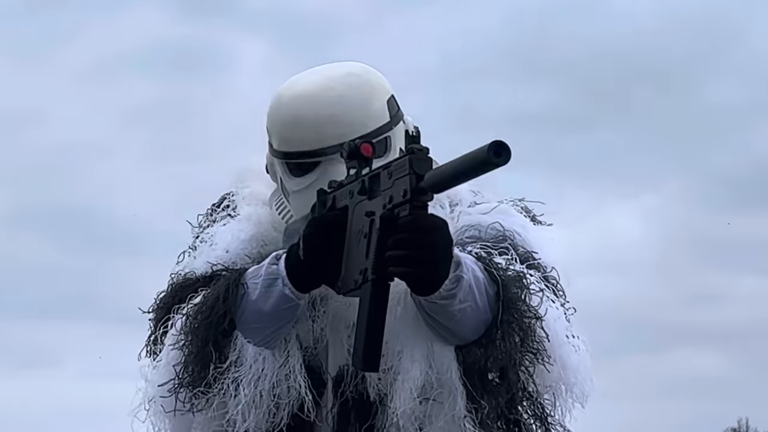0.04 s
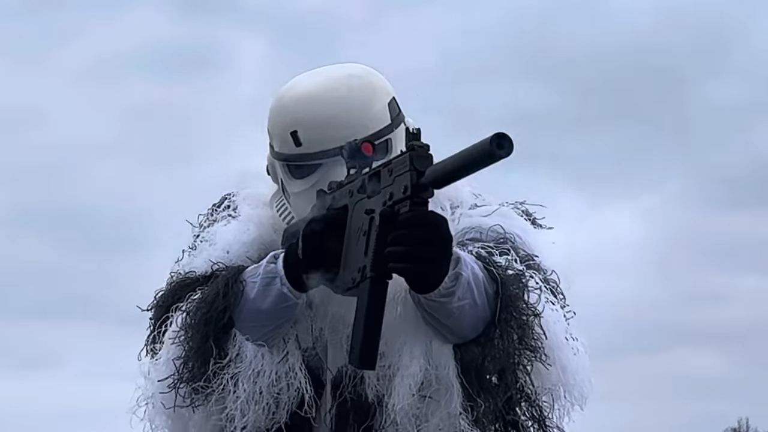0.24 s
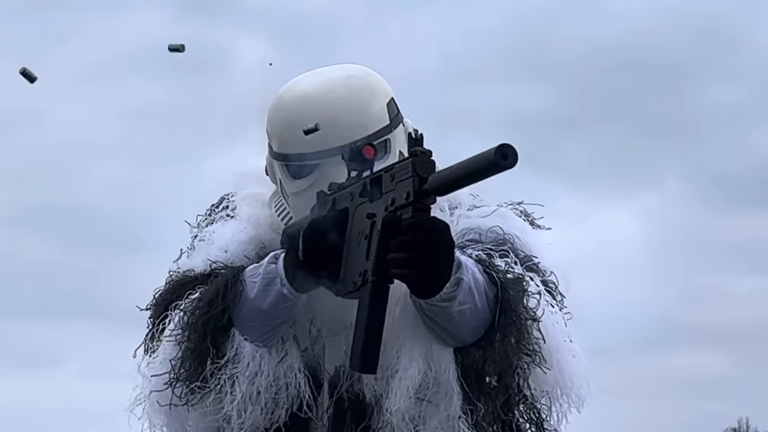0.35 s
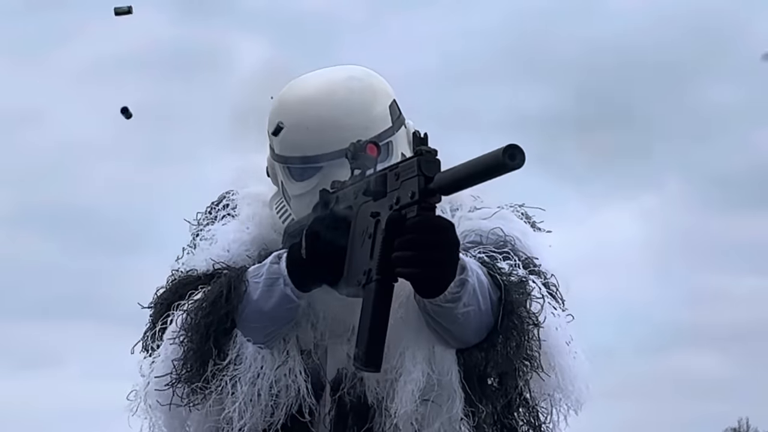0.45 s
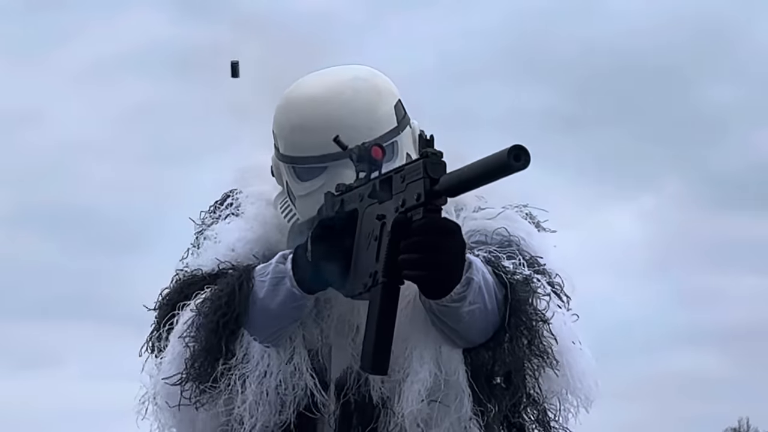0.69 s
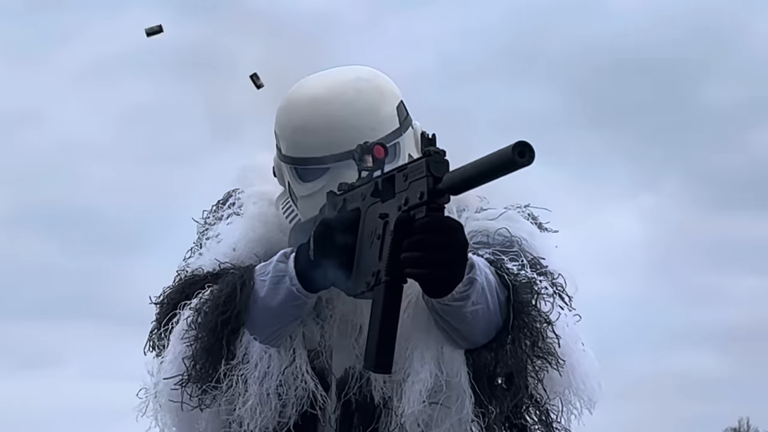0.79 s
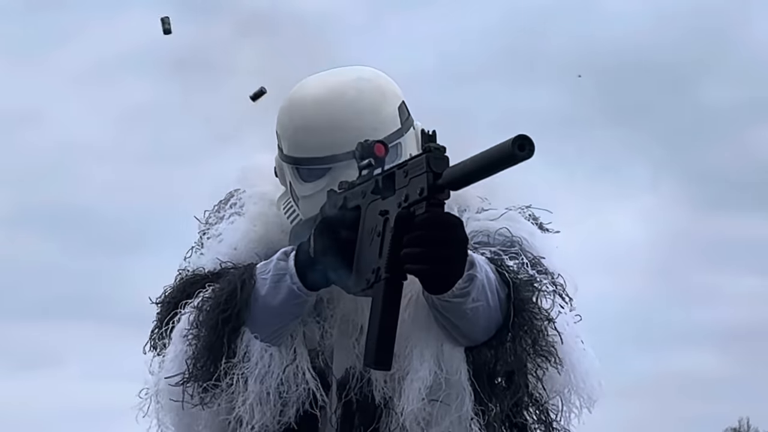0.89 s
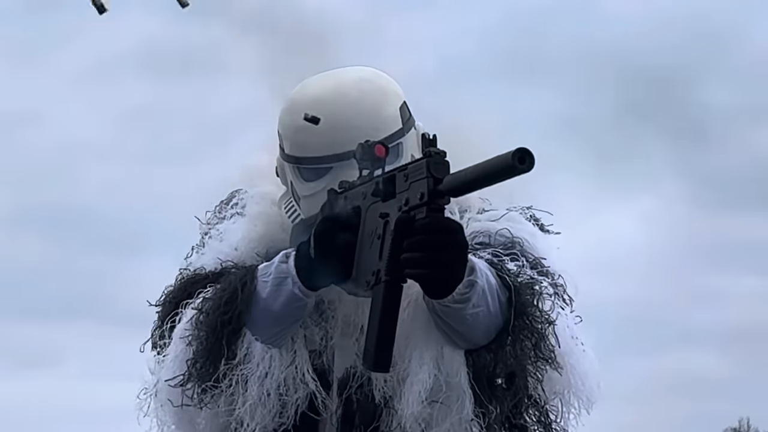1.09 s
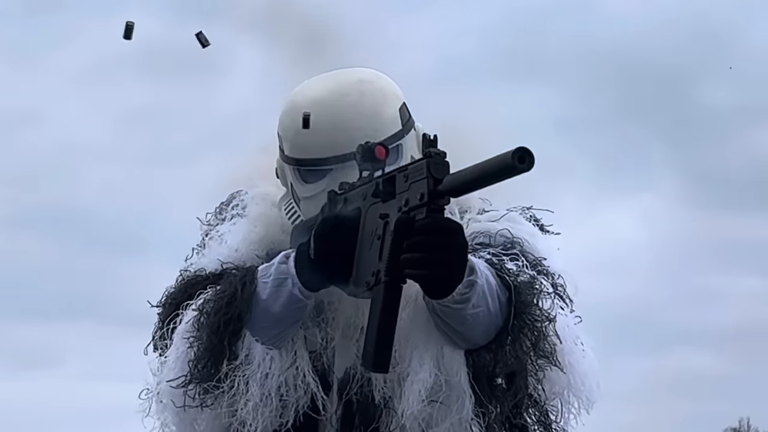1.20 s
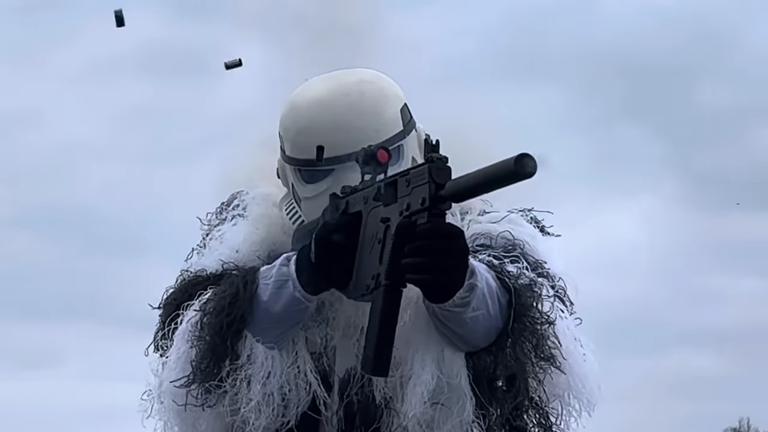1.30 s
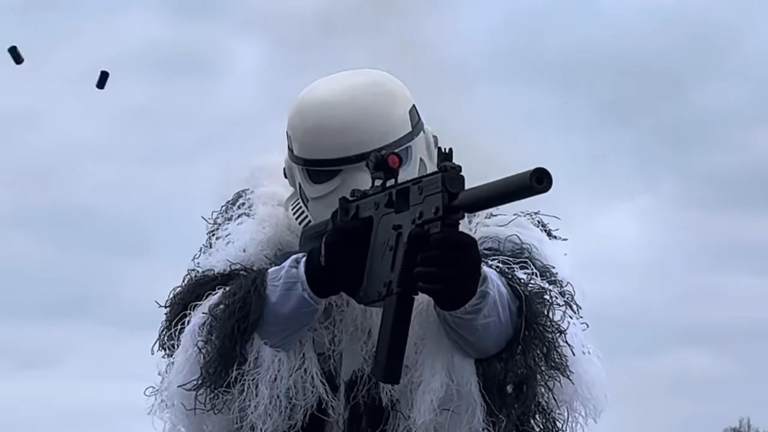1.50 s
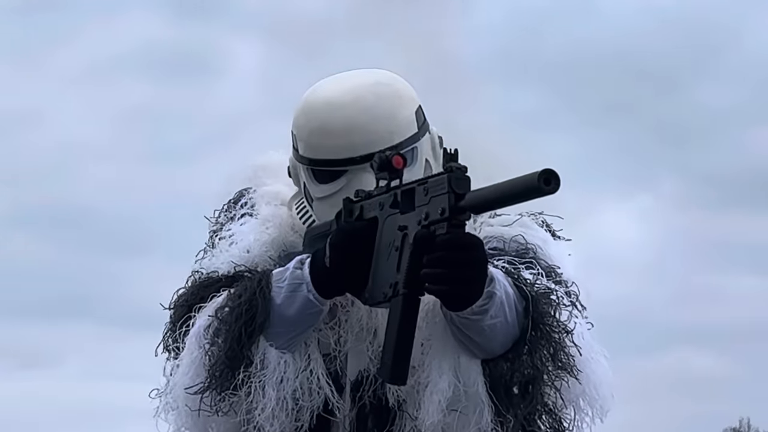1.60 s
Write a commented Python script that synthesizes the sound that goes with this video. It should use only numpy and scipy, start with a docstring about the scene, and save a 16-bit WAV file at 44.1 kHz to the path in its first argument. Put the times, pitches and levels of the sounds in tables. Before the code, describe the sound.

After a brief low rumble and tiny metal ticks, a silenced automatic weapon rattles off about twenty rounds in an even stream, then stops dead; outdoors, a few metres from a phone, dry with short ground echoes.

```python
"""Outdoors, a few metres from a phone: a suppressed automatic gun fires one fast burst.
Each round is a short spitting crack of shaped noise with a ground echo, a thump made of three pulses
whose bass arrives late, and noisy bolt clatter with a brief ring of steel. Washes of noise echo the cracks.
Wavering rumble, dull air and the faint hiss of earlier fire lie behind it.
A few lone metal ticks are spread around the burst, and a faint thump follows it."""
import sys
import numpy as np
from scipy import signal
from scipy.fft import rfft, irfft, next_fast_len
from scipy.io import wavfile
from scipy.ndimage import uniform_filter1d

SR = 44100
rng = np.random.default_rng(int(sys.argv[2]) if len(sys.argv) > 2 else 0)


def transcribe(signal):
    """Save signal, clipped to [-1, 1], as a 16-bit WAV file at the path in sys.argv[1]."""
    frames = np.atleast_2d(signal).T
    limited = np.clip(frames, -1, 1)
    pcm = np.round(limited * 32767).astype(np.int16)
    wavfile.write(sys.argv[1], SR, pcm)


def volts_from_db(level):
    """Convert decibel levels to linear amplitude ratios."""
    exponent = np.asarray(level, float) / 20
    return 10 ** exponent


N = 72765  # length in samples
T = np.arange(N) / SR  # time of each sample, s
SIZE = next_fast_len(N + SR // 2)  # transform length, with room for late sound
HZ = np.maximum(np.arange(SIZE // 2 + 1) * SR / SIZE, 1)  # the frequencies it holds

# Loudness of the rumble over time: (t/s, level/dB)
RUMBLE_LEVEL = [(0, -34.5), (.09, -36.5), (.19, -41), (.3, -29), (.55, -32), (.66, -52), (1.36, -54),
                (1.45, -68), (1.65, -76)]
# Colour of the rumble: (f/Hz, relative level/dB)
RUMBLE_COLOUR = [(15, -27.5), (25, -13.5), (56, 0.5), (118, -17), (188, -20), (219, -16.5), (307, -33.5),
                 (500, -45.5), (650, -69.5), (1100, -120)]
# Loudness of the hiss over time: (t/s, level/dB)
HISS_LEVEL = [(0, -53.5), (.08, -60), (.2, -65), (1.4, -60.5), (1.55, -70), (1.65, -73)]
# Colour of the hiss: (f/Hz, relative level/dB)
HISS_COLOUR = [(290, -43.5), (500, -18), (571, -13.5), (1190, -16.5), (1320, -3), (3300, -2.5), (4490, -1),
               (12000, -24), (15600, -62.5), (22000, -120)]
# Loudness of the outdoor air over time: (t/s, level/dB)
AIR_LEVEL = [(0, -52), (.2, -58), (1.4, -56.5), (1.55, -68), (1.65, -68)]
# Colour of the outdoor air: (f/Hz, relative level/dB)
AIR_COLOUR = [(35, -27), (60, 5), (86, 3.5), (213, -8), (287, -17), (318, -13.5), (1200, -26), (1560, -56),
              (2640, -120)]
# The rounds: (t/s, crack level/dB before CRACK_GAIN_DB, knock f/Hz, knock level/dB,
#              thump f/Hz, thump level/dB, boom f/Hz, boom level/dB); the last three levels before PULSE_PARTS
SHOTS = [(0.2287, -8.5, 1260, -15, 325, -20, 85, -24), (0.2762, -5.5, 670, -10.5, 340, -8.5, 88, -20),
         (0.3269, -4, 905, -16, 220, -13.5, 117, -22), (0.3758, -4, 956, -16.5, 414, -16.5, 84, -19),
         (0.4221, -3.5, 880, -19, 400, -22.5, 94, -24), (0.4675, -4, 810, -11, 213, -19.5, 132, -24),
         (0.5195, -5, 578, -26.5, 510, -16.5, 173, -27), (0.5684, -4.5, 902, -18, 330, -23, 96.9, -34),
         (0.6154, -2.5, 634, -12.5, 331, -21, 123, -37.5), (0.6688, -3, 1290, -18, 197, -32.5, 132, -37),
         (0.7361, -5, 740, -28, 227, -32.5, 178, -48.5), (0.7835, -4, 1158, -26, 450, -25, 101, -46.5),
         (0.836, -6, 656, -23, 376, -22.5, 162, -36), (0.8855, -5.5, 970, -21.5, 370, -24, 177, -33.5),
         (0.9356, -8.5, 648, -33.5, 520, -27, 163, -44), (0.9953, -5, 1010, -21, 398, -17.5, 137, -31),
         (1.044, -6.5, 770, -28.5, 277, -29.5, 172, -40), (1.0987, -4, 743, -18, 528, -40, 178, -42),
         (1.1465, -5, 960, -22, 256, -25.5, 152, -39), (1.1977, -7, 650, -32, 523, -39, 174, -40),
         (1.2544, -5.5, 977, -31.5, 415, -25.5, 147, -35.5),
         (1.3064, -7.5, 600, -23.5, 530, -25.5, 92.4, -40), (1.3579, -9, 893, -34, 340.6, -24, 176, -39.5)]
# Short and longer echo of each crack: (level/dB added to the crack level in SHOTS, t60/s)
ECHO_DECAYS = [(-20, 0.056), (-37.5, 0.12)]
# Colour of the echoes: (f/Hz, relative level/dB)
ECHO_COLOUR = [(300, -3), (900, -13.5), (2200, -8.5), (4800, 0.5), (6500, 0.5), (8500, -6), (12000, -9.5),
               (15500, -18.5)]
# Steps of the bolt in each cycle: (t/s from the shot, level/dB added to the crack level in SHOTS, t60/s)
BOLT_STEPS = [(-.005, -27.5, 0.085), (.015, -30.5, 0.044), (0.035, -33, .04)]
# Colour of the clatter: (f/Hz, relative level/dB)
BOLT_COLOUR = [(400, -2.5), (1000, -4.5), (2200, -1.5), (3500, -4.5), (5000, -1.5), (6500, -5),
               (8500, -20.5), (12000, -24.5), (15500, -23)]
# Ringing tones of the steel: (f/Hz, relative level/dB, t60/s before limiting to 0.005-0.08)
STEEL_TONES = [(1771, -13, 0.026), (2400, -24, 0.075), (3553, 11.5, 0.004), (4350, -1.5, 0.0067),
               (4950, -2.5, 0.021), (7500, -9, 0.0049)]
# Lone ticks of metal: (t/s, level/dB, t60/s)
TICKS = [(0.011, -48.5, 0.06), (.067, -46, .03), (.712, -58, 0.023), (1.412, -45.5, 0.039),
         (1.509, -61, 0.053), (1.553, -57.5, .03)]
# Knock, thump and boom of every pulse: (width/octaves, gain/dB)
PULSE_PARTS = [(0.351, -5.5), (.5, 3), (.7, 16.5)]
# Knock, thump and boom of the faint late thump: (f/Hz, level/dB before PULSE_PARTS)
FAR_THUMP_BANDS = [(950, -58), (323, -54.5), (129, -54.5)]
# Colour of the crack: (f/Hz, relative level/dB)
CRACK_COLOUR = [(150, -20), (500, -7), (900, -7.5), (1300, -6.5), (2200, -6.5), (3200, -3.5), (4800, -3),
                (6300, -3), (7500, -8.5), (9500, -20.5), (12000, -15.5), (15500, -32)]
# How far left leads right: (f/Hz, phase/radians)
PORT_PHASE = [(0, .3), (300, .4), (750, 0), (1500, -.35), (2100, 0), (3200, .7), (5200, .1), (8500, 0),
              (10150, -3.14), (11900, -6.28), (13900, -9.42), (15500, -12.56)]
# Sound that differs between the two ports: (f/Hz, level/dB)
LOOSE_LEVEL = [(40, -24.5), (300, -17), (750, -6.5), (1400, -13), (3000, -16), (6000, -23), (9000, -14.5),
               (12000, -12), (15000, -14.5)]

RATTLES, RATTLE_SPAN_S, RATTLE_T60_S = 4, (0.0089, 0.049), 0.043  # loose parts after each shot
RATTLE_DB, RATTLE_SCATTER_DB = -40, 7  # added to the crack level in SHOTS
BOLT_SCATTER_DB, BOLT_SCATTER_S, BOLT_RISE_S = 2, 0.001, 0.00067
STEEL_DB = -10  # ring against clatter
FAR_THUMP_S, THUMP_LAG_S = 1.4645, 0.002943  # time of the late thump; lag of the others behind their shots
AFTER_DB, AFTER_S = -10.5, (0.0018, 0.007)  # a weaker second pulse, this much later
LATE_AT_100_HZ_S, LATE_POWER = 0.01378, 1.2  # delay falls as pitch ** -power
PHASE_SPREAD = 0.87  # radians
CRACK_GAIN_DB, CRACK_LATE_CYCLES = -5.5, 1.2
RISE_S, HOLD_S, SAG_DB_PER_S, FALL_DB_PER_S = 0.00037, 0.0036, 602.5, 5006
SPIT_HZ, SPIT_DB = 1500, 3  # how fast and how deep the gas flickers
GROUND_S, GROUND_DB = 0.00209, -8


def shape(table):
    """Gain at every frequency from (f/Hz, level/dB) points; steep below the first, flat above the last."""
    hz, db = np.array(table, float).T
    octaves_under = np.maximum(np.log2(hz[0] / HZ), 0)
    return volts_from_db(np.interp(np.log(HZ), np.log(hz), db) - 18 * octaves_under)


def filt(x, response):
    """Apply a frequency response."""
    return irfft(rfft(x, SIZE) * response, SIZE)[..., :N]


def causal(gain):
    """Give a gain the phase that reacts soonest, and keep the power of white noise unchanged."""
    cepstrum = irfft(np.log(gain), SIZE)
    cepstrum[1:SIZE // 2] *= 2
    cepstrum[SIZE // 2 + 1:] = 0
    return np.exp(rfft(cepstrum)) / np.sqrt(np.mean(gain ** 2))


def delay(seconds):
    """Frequency response of a plain delay."""
    return np.exp(-2j * np.pi * HZ * seconds)


def noise():
    """Two unrelated white noises: one common to the ports, one loose."""
    return rng.standard_normal((2, N))


def curve(table):
    """Gain over time from (t/s, level/dB) points."""
    return volts_from_db(np.interp(T, *np.array(table).T))


def decays(rows):
    """Envelope of sudden starts that die away: rows (t/s, level/dB, t60/s); powers add."""
    power = 0
    for start, db, t60 in rows:
        power = power + (T >= start) * volts_from_db(2 * db - 120 * np.clip(T - start, 0, 2) / t60)
    return np.sqrt(power)


def steady(table):
    """Steady noise with the colour of a table, which goes on falling above its last point."""
    last_hz, last_db = table[-1]
    return filt(noise(), causal(shape(table + [(4 * last_hz, last_db - 30)])))


def rumble():
    """Low noise whose level wavers at random."""
    waver_db = 2 * uniform_filter1d(rng.standard_normal(N), 2000) * np.sqrt(2000)
    return curve(RUMBLE_LEVEL) * volts_from_db(waver_db) * steady(RUMBLE_COLOUR)


def hiss():
    """Faint noise left by earlier fire, following its own loudness curve."""
    return curve(HISS_LEVEL) * steady(HISS_COLOUR)


def air():
    """Dull outdoor air: soft noise with little treble."""
    return curve(AIR_LEVEL) * steady(AIR_COLOUR)


def echoes():
    """The range scatters each crack back as a short and a longer wash of noise."""
    rows = []
    for start, db, *_ in SHOTS:
        rows += [(start + HOLD_S, db + under, t60) for under, t60 in ECHO_DECAYS]
    return filt(decays(rows) * noise(), causal(shape(ECHO_COLOUR)))


def steel_ring():
    """Response of the steel: narrow peaks, narrower for longer rings, scaled to unit noise gain."""
    ring = 0
    for hz, db, t60 in STEEL_TONES:
        sharpness = 2 * np.pi * np.clip(t60, 0.005, 0.08) / np.log(1000)
        ring = ring + volts_from_db(db) / (1 + 1j * (HZ - hz) * sharpness)
    return ring / np.sqrt(np.mean(abs(ring) ** 2))


def bolt():
    """The bolt closes, hits its rear stop and returns, loose parts rattle; steel rings briefly."""
    rows = list(TICKS)
    for shot_s, shot_db, *_ in SHOTS:
        for lag, db, t60 in BOLT_STEPS:
            time_luck, level_luck = rng.standard_normal(2)
            scatter = BOLT_SCATTER_S * time_luck * (lag > 0)  # the step before the shot keeps its time
            rows.append((shot_s + lag + scatter, shot_db + db + BOLT_SCATTER_DB * level_luck, t60))
        for _ in range(RATTLES):
            start = shot_s + rng.uniform(*RATTLE_SPAN_S)
            db = shot_db + RATTLE_DB + RATTLE_SCATTER_DB * rng.standard_normal()
            rows.append((start, db, RATTLE_T60_S))
    envelope = uniform_filter1d(decays(rows), int(BOLT_RISE_S * SR) + 1)  # softens the starts
    return filt(envelope * noise(), causal(shape(BOLT_COLOUR)) + volts_from_db(STEEL_DB) * steel_ring())


def thumps():
    """A pressure pulse in three bands and a weaker one after it, spread into a falling sweep."""
    rows = [(start + THUMP_LAG_S, *bands) for start, _, *bands in SHOTS]
    rows.append((FAR_THUMP_S, *np.ravel(FAR_THUMP_BANDS)))
    total = 0
    for start, *bands in rows:
        turns = rng.standard_normal(4)
        parts = []
        for hz, db, (width, gain_db), turn in zip(bands[::2], bands[1::2], PULSE_PARTS, turns):
            hump = np.exp(-0.5 * (np.log2(HZ / hz) / width) ** 2)
            parts.append(volts_from_db(db + gain_db) * hump * np.exp(1j * PHASE_SPREAD * turn))
        knock, thump, boom = parts
        second = volts_from_db(AFTER_DB) * delay(rng.uniform(*AFTER_S))  # the boom has no second pulse
        pulse = boom + (knock + thump) * (1 + second)
        common_and_loose = np.array([[1], [np.exp(2j * turns[3])]])
        total = total + pulse * delay(start) * common_and_loose
    bend = LATE_POWER - 1
    sweep = np.exp(2j * np.pi * LATE_AT_100_HZ_S * 100 * (100 / HZ) ** bend / bend)
    return irfft(100 * total * sweep, SIZE)[:, :N]


def cracks():
    """Gas spits from the muzzle for a few ms, then stops fast; the ground repeats it."""
    envelope = 0
    for start, db, *_ in SHOTS:
        t = T - start
        sag = SAG_DB_PER_S * np.clip(t, 0, HOLD_S)
        fall = FALL_DB_PER_S * np.clip(t - HOLD_S, 0, 0.1)
        rise = np.clip(t / RISE_S + 0.5, 0, 1)
        envelope = envelope + rise * volts_from_db(db + CRACK_GAIN_DB - sag - fall)
    span = int(SR / SPIT_HZ)  # samples averaged for the flicker
    spit = uniform_filter1d(rng.standard_normal(N), span) * np.sqrt(span)
    # lower pitches come later, counted from 8 kHz
    late = np.exp(-2j * np.pi * CRACK_LATE_CYCLES * (np.log(HZ / 8000) - HZ / 8000))
    ground = 1 + volts_from_db(GROUND_DB) * delay(GROUND_S)
    return filt(envelope * volts_from_db(SPIT_DB * spit) * noise(), causal(shape(CRACK_COLOUR)) * ground * late)


def scene():
    """Two close ports hear the scene with a phase gap that cancels some treble in their sum."""
    common, loose = rumble() + hiss() + air() + echoes() + bolt() + thumps() + cracks()
    half_gap = np.interp(HZ, *np.array(PORT_PHASE).T) / 2
    apart = filt(loose, shape(LOOSE_LEVEL))
    left = filt(common, np.exp(1j * half_gap)) + apart
    right = filt(common, np.exp(-1j * half_gap)) - apart
    return np.array([left, right])


def top_cut(x):
    """Nothing passes above the cut-off."""
    return signal.sosfilt(signal.butter(12, 17130, fs=SR, output="sos"), x)


def record(dry):
    """The phone rounds the peaks and cuts the top above 16 kHz."""
    soft = np.tanh(1.1 * dry) / 1.1
    low_pass = signal.ellip(8, 0.2, 70, 16000, fs=SR, output="sos")
    mix = signal.sosfilt(low_pass, soft)
    return top_cut(mix)


dry = scene()
out = record(dry)
transcribe(out)
```